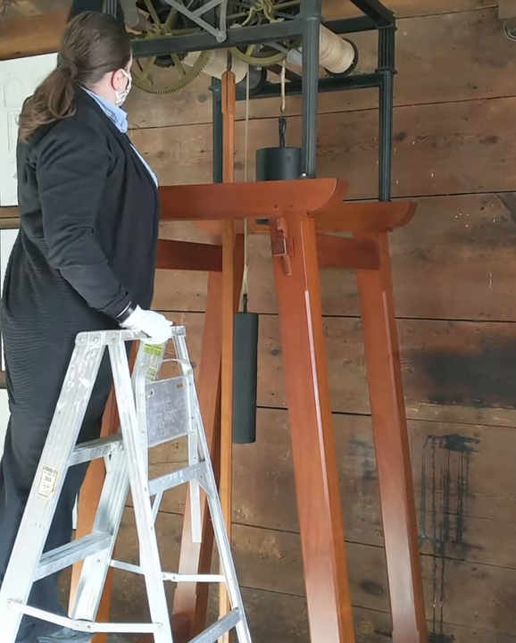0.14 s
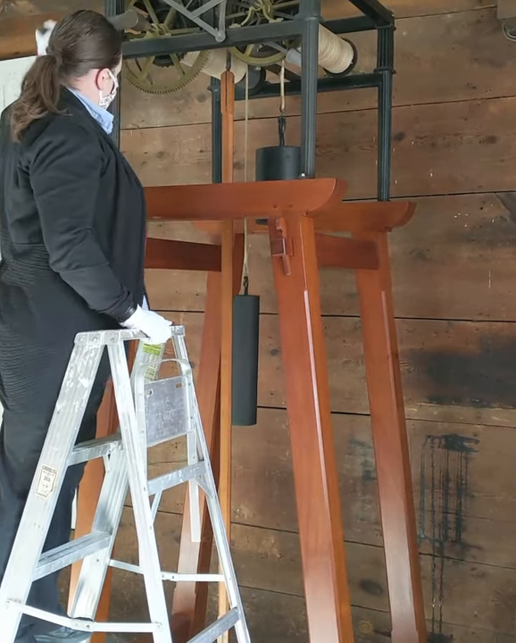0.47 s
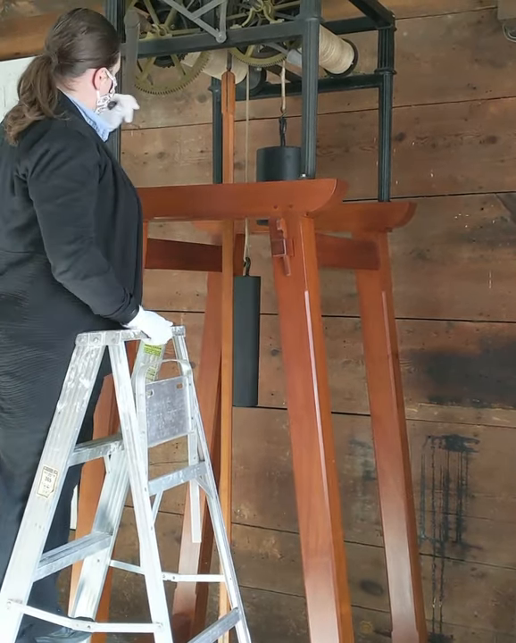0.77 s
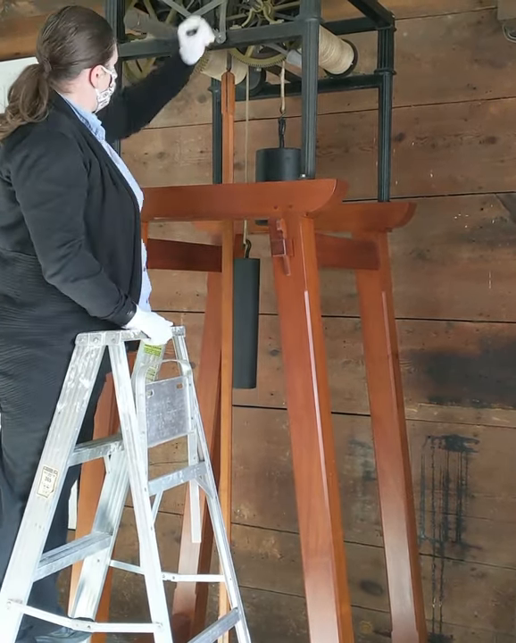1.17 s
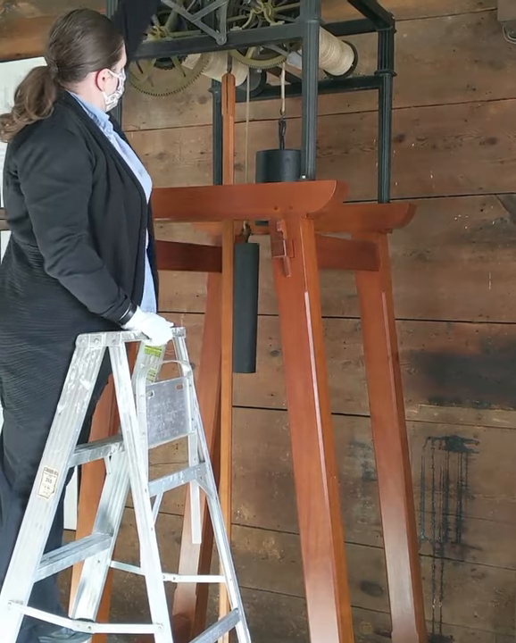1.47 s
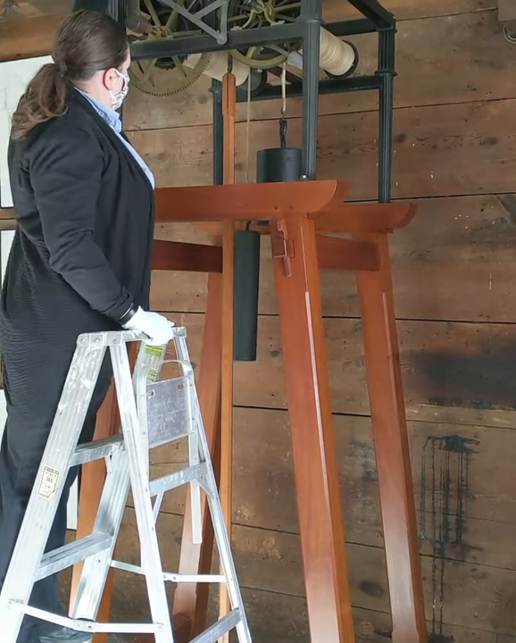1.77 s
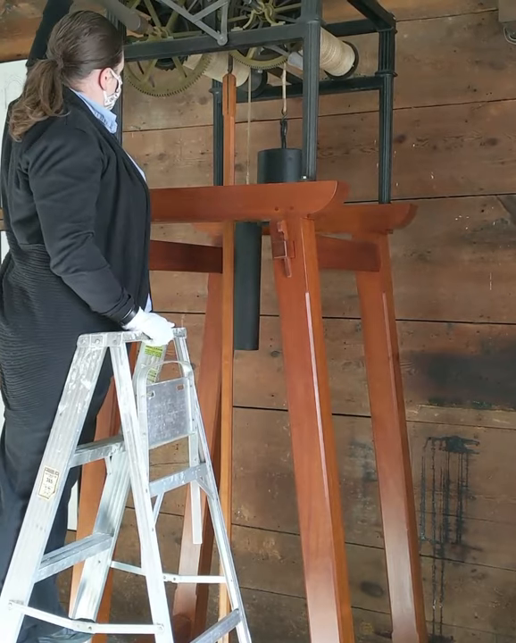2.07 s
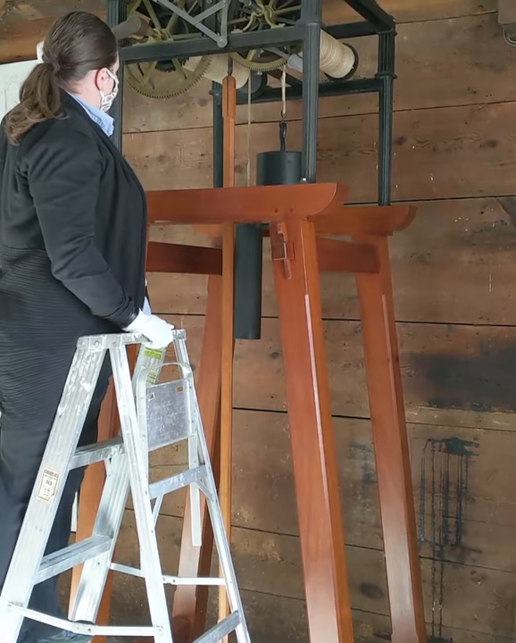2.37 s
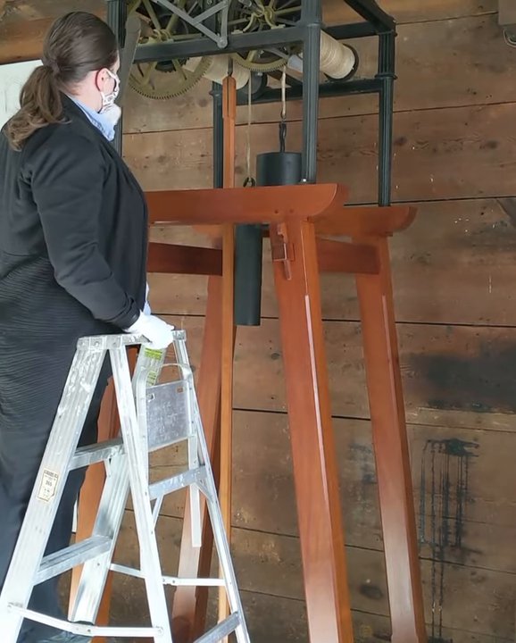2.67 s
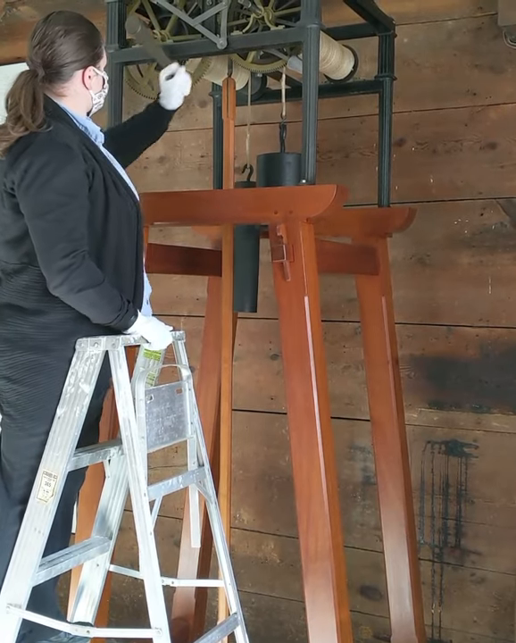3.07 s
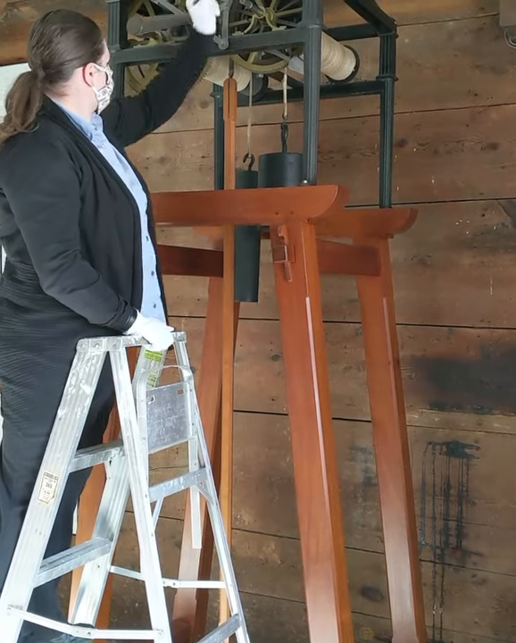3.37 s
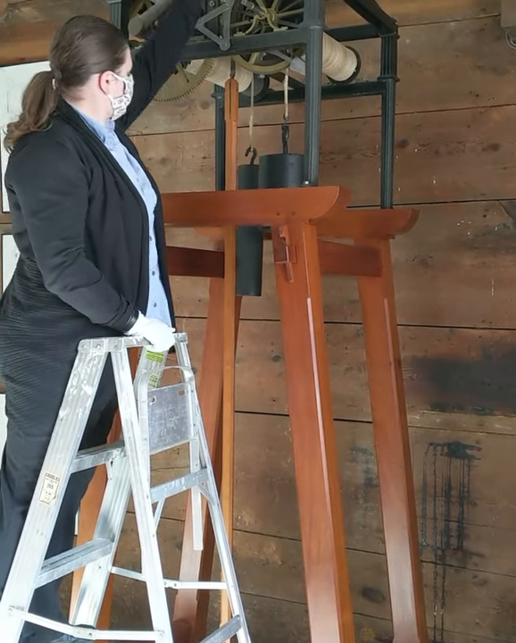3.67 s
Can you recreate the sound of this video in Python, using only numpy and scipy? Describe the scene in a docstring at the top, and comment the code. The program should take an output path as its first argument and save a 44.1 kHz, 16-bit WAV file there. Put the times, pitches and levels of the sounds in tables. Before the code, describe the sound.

A loud, bright metal ratchet dominates. The tail of a winding stroke fades at 0 s, then from 0.15 s a steel pawl chatters in a near-continuous harsh rasp, roughly 13 to 18 uneven teeth per second, with thin high ringing slightly left. Gears grind grittily below, with faint low hums. It softens slightly around 2.1 s, the teeth space out after 3.4 s, and it stops near 3.77 s in a short wooden-room tail over low rumble.

```python
"""In a timber room, a tower clock is wound by a hand crank. A steel pawl chatters over the teeth of the ratchet
in a near-continuous rasp, with a pause after the first tooth and wider gaps between the last ones.
The rasp is tiny random impacts sent through steel resonances; the wheel and pawl ring as unsteady sine notes.
Underneath, the gears grind as random grit coloured by the frame, faint low hums swell and fade,
and filtered noise makes a low room rumble and still air."""
import sys
import numpy as np
from scipy import signal
from scipy.fft import rfft, irfft, next_fast_len
from scipy.io import wavfile

SR = 44100
rng = np.random.default_rng(int(sys.argv[2]) if len(sys.argv) > 2 else 0)


def transcribe(signal):
    """Save signal, clipped to [-1, 1], as a 16-bit WAV file at the path in sys.argv[1]."""
    frames = np.atleast_2d(signal).T
    limited = np.clip(frames, -1, 1)
    pcm = np.round(limited * 32767).astype(np.int16)
    wavfile.write(sys.argv[1], SR, pcm)


N = 169344
LEAD = SR // 5  # samples before time zero: the winding is already under way
TIME = np.arange(-LEAD, N) / SR  # seconds
TOP_HZ = 15750  # upper limit of the sound

ATTACK_S, RELEASE_S = 0.0055, 0.015  # the pawl presses on a tooth and leaves it
# Teeth of the ratchet as the pawl meets them; levels are relative within each column:
# (start [s], scrape length [s], rasp level [dB], pawl ring level [dB])
RATCHET_TEETH = [(-0.09, 0.052, -22, -24), (0.154, 0.067, -18, -30), (0.245, 0.054, -15.5, -35),
                 (0.304, 0.042, -14, -36), (0.354, 0.047, -16, -28), (0.403, 0.054, -16, -28),
                 (0.465, 0.042, -16, -27.5), (0.525, 0.063, -15.5, -32), (0.585, 0.039, -14.5, -41),
                 (0.633, 0.055, -15, -27.5), (0.693, 0.058, -14, -62), (0.744, 0.058, -15, -35),
                 (0.801, 0.05, -14, -30), (0.858, 0.046, -14.5, -25), (0.922, 0.038, -16, -28.5),
                 (0.982, 0.053, -15, -30.5), (1.056, 0.056, -16, -25.5), (1.124, 0.056, -14, -29.5),
                 (1.186, 0.043, -14, -34), (1.245, 0.041, -12.5, -28), (1.304, 0.044, -14.5, -29),
                 (1.36, 0.04, -14.5, -36), (1.409, 0.054, -14, -32), (1.464, 0.067, -15.5, -34),
                 (1.517, 0.045, -14, -30), (1.57, 0.062, -14, -29.5), (1.626, 0.054, -17.5, -35),
                 (1.677, 0.037, -14, -61), (1.73, 0.05, -14.5, -33.5), (1.806, 0.047, -15, -37),
                 (1.884, 0.059, -15, -32.5), (1.961, 0.042, -14.5, -26), (2.026, 0.077, -17.5, -27.5),
                 (2.108, 0.065, -19, -30), (2.187, 0.06, -16.5, -31.5), (2.268, 0.062, -17.5, -35),
                 (2.34, 0.058, -16.5, -31), (2.407, 0.047, -16.5, -35), (2.467, 0.057, -15.5, -34),
                 (2.533, 0.06, -17.5, -37), (2.588, 0.056, -17, -32), (2.644, 0.039, -17, -46),
                 (2.695, 0.048, -14.5, -57), (2.748, 0.045, -14.5, -38), (2.814, 0.048, -16, -44),
                 (2.89, 0.053, -17, -33.5), (2.982, 0.055, -17, -33), (3.075, 0.054, -16.5, -32),
                 (3.152, 0.073, -15, -34.5), (3.219, 0.057, -15, -35.5), (3.286, 0.032, -13.5, -28.5),
                 (3.346, 0.048, -13.5, -34), (3.411, 0.061, -16, -46), (3.494, 0.058, -16.5, -35.5),
                 (3.599, 0.052, -15, -29.5), (3.717, 0.049, -14.5, -36.5)]


def strokes(levels_db):
    """The pawl's power over time: it presses, holds and lets go on each tooth."""
    power = np.zeros(len(TIME))
    for (start, length, *_), db in zip(RATCHET_TEETH, levels_db):
        near = slice(*np.searchsorted(TIME, [start, start + 1 / 2]))
        age = TIME[near] - start
        attack = np.clip(age / ATTACK_S, 0, 1)
        release = np.exp(-np.maximum(age - length, 0) / RELEASE_S)
        power[near] += (amp(db) * attack * release) ** 2
    return power


def turning():
    """1 while the crank turns, 0 in the pause after the first tooth and after the last."""
    first, second, last = RATCHET_TEETH[0], RATCHET_TEETH[1], RATCHET_TEETH[-1]
    before_pause = TIME < first[0] + first[1]
    after_pause = (TIME > second[0]) & (TIME < last[0] + last[1])
    return before_pause | after_pause


def drops(over_scrape_db=20):
    """One sharp click as the pawl lands on each tooth."""
    start, _, rasp_db, _ = np.transpose(RATCHET_TEETH)
    landing = np.searchsorted(TIME, start + ATTACK_S)
    return np.bincount(landing, amp(rasp_db + over_scrape_db), len(TIME))


def slips(per_s=205, depth_db=8):
    """The scraping pawl catches and slips in quick, nearly regular ticks that each fade; rms 1."""
    pace = per_s * amp(2 * wobble(hz=20)[0])
    cycle = np.cumsum(pace) / SR
    return unit(amp(-depth_db * (cycle % 1)))


def impacts(per_s, spread_db):
    """Tiny impacts of uneven size at a loosely even pace, rms 1."""
    pace = rng.exponential(size=len(TIME)) ** 2 / 2  # mean 1
    hit = np.diff(np.floor(np.cumsum(pace) * per_s / SR), prepend=0) > 0
    sign, size = rng.standard_normal((2, len(TIME)))
    return unit(hit * np.sign(sign) * amp(spread_db * np.clip(size, -2, 2)))


RASP_DB = -0.43
STEEL_Q = 103  # a resonance's frequency over its width, roughly
# Broad colour of the steel, before the rasp is evened out in power: (frequency [Hz], relative level [dB])
STEEL_COLOUR = [(900, -41.5), (2000, -25.5), (2900, -16.5), (3400, -12), (3750, -16.5), (4580, -13.5),
                (4700, -17), (4840, -27), (4990, -10.5), (5350, -13), (5900, -4.5), (6200, -13.5),
                (6800, -18.5), (7600, -14.5), (8600, -12), (9700, -12.5), (10400, -17.5), (11300, -13.5),
                (12000, -5.5), (12800, -9.5), (13080, -2.5), (13400, -14), (15700, -16.5)]
# Resonances of the ratchet wheel, used again for its ring: (frequency [Hz], relative level [dB])
WHEEL_MODES = [(2802, -11), (3352, -4), (4032, -4.5), (4355, -17.5), (5480, -12.5), (5572, -8.5),
               (5882, -5), (6300, -17), (7811, -11.5), (8555, -7.5), (8618, -10.5), (9050, -10.5),
               (9641, -10.5), (12408, -13.5), (12475, -4.5), (13076, -7.5)]


def rasp(force):
    """The pawl lands on each tooth, chatters along it and excites the steel's resonances."""
    def steel(hz):
        peaks = sum(amp(db) ** 2 / (1 + 2 * (STEEL_Q * (hz / f - 1)) ** 2) ** 2 for f, db in WHEEL_MODES)
        colour = np.sqrt(amp(along(STEEL_COLOUR, hz)) ** 2 + peaks)
        return colour / (1 + (hz / TOP_HZ) ** 64)  # steep fall above the top

    scrape = force * slips() * impacts(per_s=3500, spread_db=1.5)
    ears = room(scrape + drops(), early_db=5, late_db=4.5, count=72)
    return amp(RASP_DB) * np.array([body(ear, steel) for ear in ears])


def wheel_ring(force, level_db=-15.5):
    """The ratchet wheel's resonances sing on with the rasp and die away after it."""
    notes = sum(amp(db) * note(hz, drift_hz=15, flutter_db=2.5) for hz, db in WHEEL_MODES)
    return amp(level_db) * ringing(force ** 2) * notes


# Where the ratchet sits: (frequency [Hz], boost on the left and equal cut on the right [dB])
RATCHET_PAN = [(2000, 0.5), (4000, 1), (7000, 0.4), (13000, 2)]


def ratchet(force):
    """Rasp and wheel ring together, leaning to the left by an amount that depends on pitch."""
    def pan(hz):
        return amp(np.outer([1, -1], along(RATCHET_PAN, hz)))

    return filtered(rasp(force) + wheel_ring(force), pan)


def pawl_ring(power, hz=3472, level_db=6.5, pan_db=4):
    """The pawl's own note swells with each stroke, stronger on the left."""
    ear_db = level_db + pan_db * np.array([[1], [-1]])
    return ringing(power) * note(hz, drift_hz=7, flutter_db=2.5) * amp(ear_db)


def ringing(power, t60_s=0.17):
    """Level of a note that swells with each scrape and falls 60 dB in t60_s seconds after it."""
    keep = amp(-60 / (t60_s * SR)) ** 2
    return np.sqrt(np.abs(signal.lfilter([1 - keep], [1, -keep], power)))


def note(hz, drift_hz, flutter_db):
    """A narrow note for each ear, made unsteady in pitch and level by ever new contacts."""
    drift = np.cumsum(drift_hz * wobble(hz=40.8), axis=1) / SR
    phase = 2 * np.pi * (hz * TIME + drift + rng.random((2, 1)))
    return np.sin(phase) * amp(flutter_db * wobble(hz=54))


GRIND_DB, GRIND_RISE_S = 1.5, 0.0048  # added level; time to take up the load
GRIND_FOLLOWS = 0.55  # share of the pawl's swings in dB
# Grinding of the gears, before GRIND_DB and the room are added: (time [s], level [dB])
GRIND_LEVEL = [(.16, -34), (.3, -35), (1.7, -34.5), (2.15, -37), (2.8, -34), (3.05, -35.5), (3.3, -35),
               (3.75, -35.5)]
# Colour of the gears heard through frame and trestle: (frequency [Hz], relative level [dB])
FRAME_COLOUR = [(120, -36.5), (175, -21.5), (210, 2), (290, -4), (360, 4.5), (455, -8.5), (540, 4),
                (660, -4.5), (830, 3), (1400, 1), (2000, -4.5), (2220, 2), (2600, -21), (8000, -32)]
# Low notes are nearly the same in both ears: (frequency [Hz], stereo width [0 to 1])
GEAR_WIDTH = [(120, 0.23), (250, 0.48), (600, 0.9)]


def gears(force):
    """Loaded teeth grind and shake the frame, a little harder on each stroke of the pawl."""
    step = 1 / (GRIND_RISE_S * SR)
    load = signal.lfilter([step], [1, step - 1], turning()) * turning()
    level = amp(GRIND_DB + np.interp(TIME, *np.transpose(GRIND_LEVEL))) * load
    grit = level * unit(force ** GRIND_FOLLOWS) * impacts(per_s=1800, spread_db=2.5)
    shaken = body(grit, lambda hz: amp(along(FRAME_COLOUR, hz)))
    left, right = room(shaken, early_db=3.0, late_db=6.5, count=6)
    side = filtered(left - right, lambda hz: along(GEAR_WIDTH, hz))
    return (left + right + np.outer([1, -1], side)) / 2


# Faint low hums in the frame: (middle [s], time from middle to silence [s], frequency [Hz], peak level [dB])
FRAME_HUMS = [(0.422, 0.12, 210.5, -38.5), (0.79, 0.16, 250, -38.5), (1.256, 0.3, 229.7, -43.5),
              (2.775, 0.09, 250, -42.5), (3.26, 0.22, 220, -47.5)]


def hum(drift_hz=5):
    """Low hums come and go in the frame, drifting in pitch together."""
    middle, half, hz, db = np.transpose(FRAME_HUMS)[..., None]
    swell = np.cos(np.pi / 2 * np.clip((TIME - middle) / half, -1, 1)) ** 4
    drift = np.cumsum(drift_hz * wobble(hz=25.9)[0]) / SR
    phase = 2 * np.pi * (hz * TIME + drift)
    return np.sum(amp(db) * swell * np.sin(phase), axis=0)


# Colour of the low room rumble: (frequency [Hz], relative level [dB])
RUMBLE_COLOUR = [(20, -17), (45, -9), (68, 3.5), (90, -8.5), (115, -3.5), (160, -11), (400, -10),
                 (2000, -49)]


def rumble(level_db=-53.5, side_db=-6.5, swing_db=3.2):
    """Low noise whose level rises and falls unevenly, mostly shared by both ears."""
    mid, side = coloured_noise(RUMBLE_COLOUR)
    stereo = mid + amp(side_db) * np.outer([1, -1], side)
    return amp(level_db) * unit(stereo * amp(swing_db * wobble(hz=6.4)[0]))


# Colour of the still air: (frequency [Hz], relative level [dB])
AIR_COLOUR = [(60, -21), (250, -2), (1200, -1), (15000, -52)]


def air(level_db=-50.5):
    """The still air of the room: steady soft noise, separate in each ear."""
    return amp(level_db) * coloured_noise(AIR_COLOUR)


EARLY_T60_S = 0.068  # time for the near scatter to fall 60 dB
# How long the room rings: (frequency [Hz], time to fall 60 dB [s])
ROOM_T60 = [(200, 0.32), (1500, 0.59), (4000, 0.49), (9000, 0.32), (15000, 0.11)]


def room(x, early_db, late_db, count=48):
    """Direct sound, scatter from the frame and the room's tail; the paths keep changing as the wheels turn."""
    out, t = np.zeros((2, len(x) + SR)), np.arange(SR // 3) / SR
    hz, age, z = signal.stft(rng.standard_normal((2, SR // 3)), SR, nperseg=256)
    fade = amp(-60 * age / along(ROOM_T60, hz)[:, None])
    for piece in np.array_split(np.arange(len(x)), count):
        random_phase = np.exp(2j * np.pi * rng.random(z.shape))
        tail = signal.istft(fade * random_phase, SR, nperseg=256)[1][:, :len(t)]
        early = rng.standard_normal(tail.shape) * amp(-60 * t / EARLY_T60_S)
        answer = amp(early_db) * early / np.linalg.norm(early[0])
        answer += amp(late_db) * tail / np.linalg.norm(tail[0])
        answer[[0, 1], rng.integers(0, 16, 2)] += 1  # direct sound, up to 15 samples late in each ear
        wet = signal.fftconvolve(x[piece][None], answer / np.linalg.norm(answer[0]), axes=1)
        out[:, piece[0]:piece[0] + wet.shape[1]] += wet
    return out[:, :len(x)]


def body(x, gain, size=16384):
    """Ring x through a solid body with this gain per frequency: no sound before the blow, power kept."""
    cepstrum = irfft(np.log(unit(gain(np.fft.rfftfreq(size, 1 / SR))) + 1e-6))
    cepstrum[1:size // 2] *= 2  # folding it makes the response start at once (minimum phase)
    cepstrum[size // 2 + 1:] = 0
    response = irfft(np.exp(rfft(cepstrum)))
    return signal.fftconvolve(x, response)[:len(TIME)]


def coloured_noise(colour):
    """Random noise for two channels, shaped by (Hz, dB) points, rms 1."""
    return unit(filtered(rng.standard_normal((2, len(TIME))), lambda hz: amp(along(colour, hz))))


def wobble(hz):
    """A smooth random curve for each ear, rms 1, with little movement faster than hz."""
    return unit(filtered(rng.standard_normal((2, len(TIME))), lambda f: 1 / (1 + (f / hz) ** 4)))


def filtered(x, response):
    """Multiply the spectrum of x by a response of frequency."""
    m = next_fast_len(N + SR)
    return irfft(rfft(x, m) * response(np.fft.rfftfreq(m, 1 / SR)), m)[..., :len(TIME)]


def along(points, hz):
    """Read (Hz, value) points on a log frequency axis."""
    f, v = np.transpose(points)
    return np.interp(np.log(hz + 1), np.log(f + 1), v)


def amp(db):
    """Decibels to gain."""
    return 10 ** (np.asarray(db) / 20)


def unit(x):
    """Scale to rms 1."""
    return x / np.sqrt(np.mean(x ** 2) + 1e-20)


def scene(drag_db=-28):
    """Ratchet, pawl, gears, hums and room; a light drag remains between teeth while the crank turns."""
    _, _, rasp_db, ring_db = np.transpose(RATCHET_TEETH)
    force = np.sqrt(strokes(rasp_db) + amp(drag_db) ** 2 * turning())
    clockwork = ratchet(force) + pawl_ring(strokes(ring_db)) + gears(force) + hum()
    return (clockwork + rumble() + air())[:, LEAD:]


def record(dry):
    """Round off the highest peaks, then keep only what lies below TOP_HZ."""
    rounded = dry / (1 + np.abs(dry / .92) ** 8) ** (1 / 8)
    return filtered(rounded, lambda hz: hz < TOP_HZ)[:, :N]


dry = scene()
out = record(dry)
transcribe(out)
```